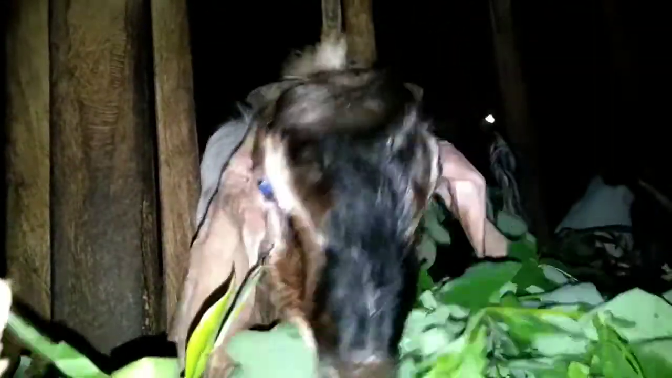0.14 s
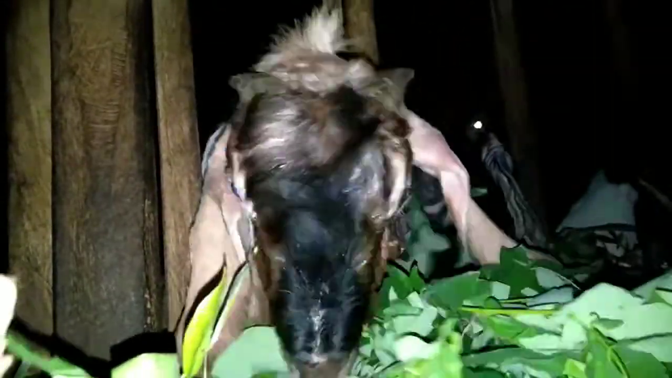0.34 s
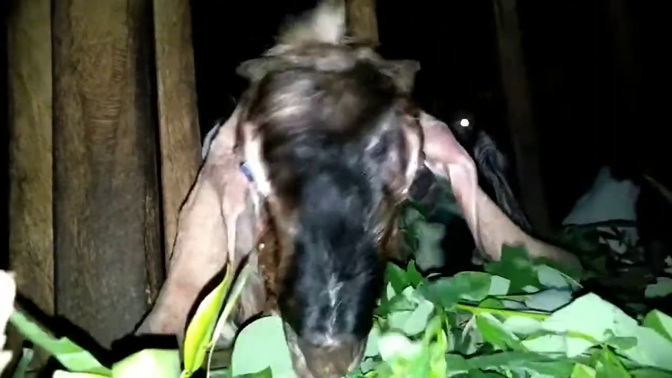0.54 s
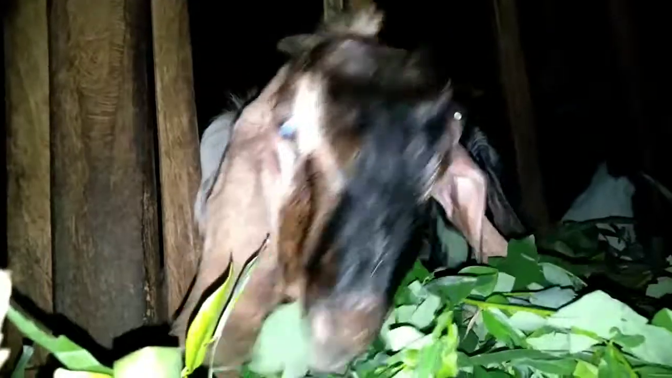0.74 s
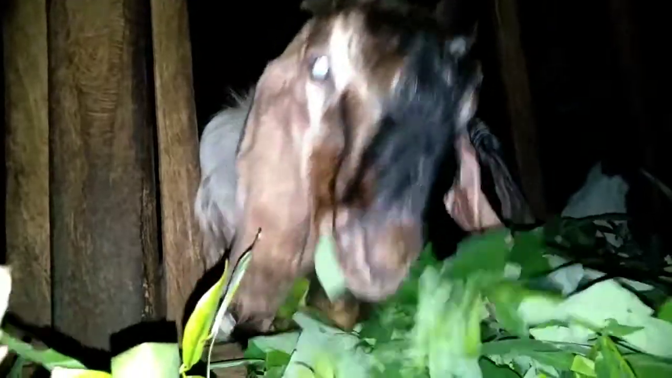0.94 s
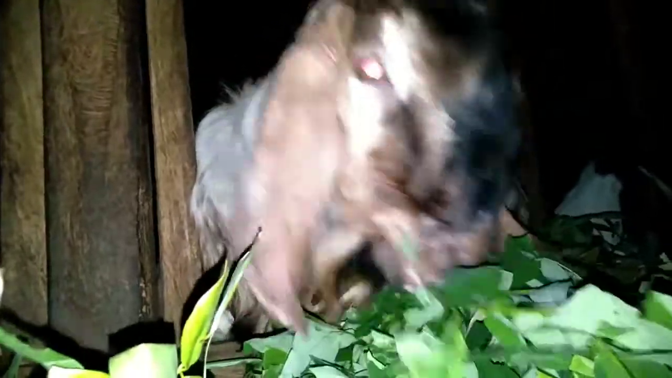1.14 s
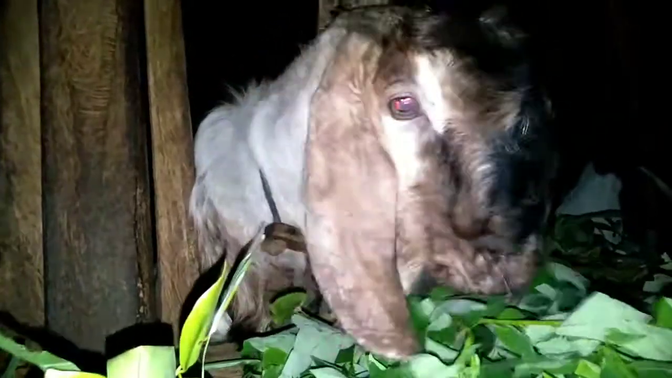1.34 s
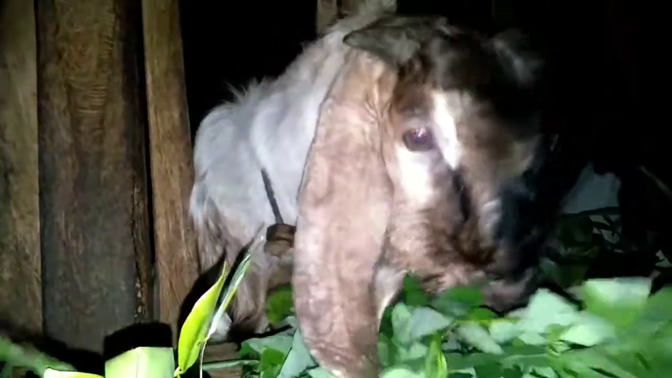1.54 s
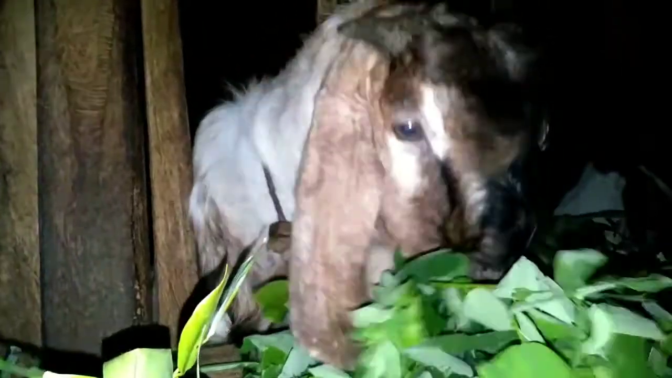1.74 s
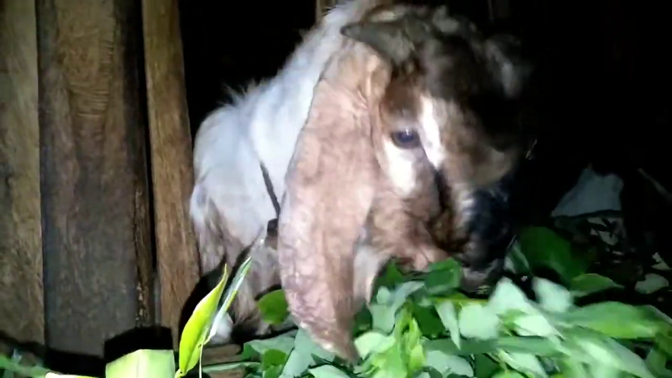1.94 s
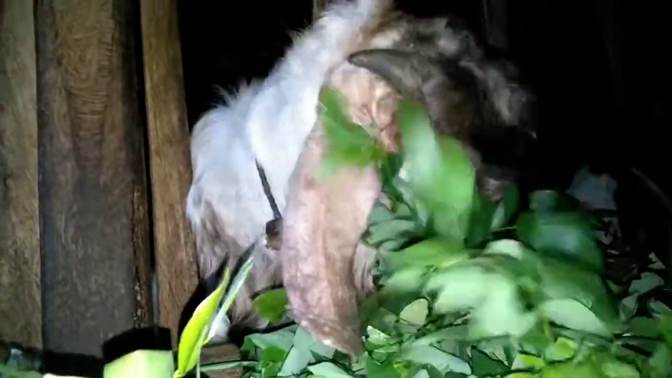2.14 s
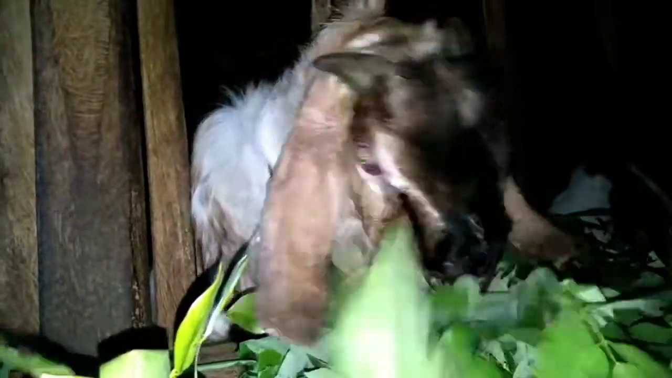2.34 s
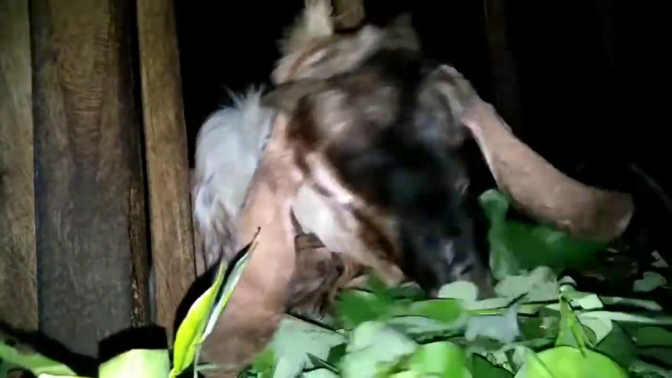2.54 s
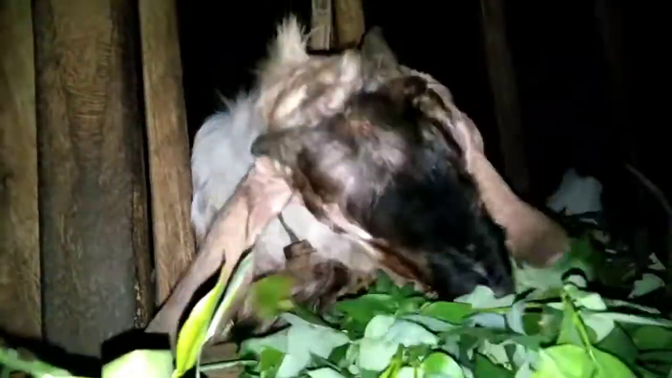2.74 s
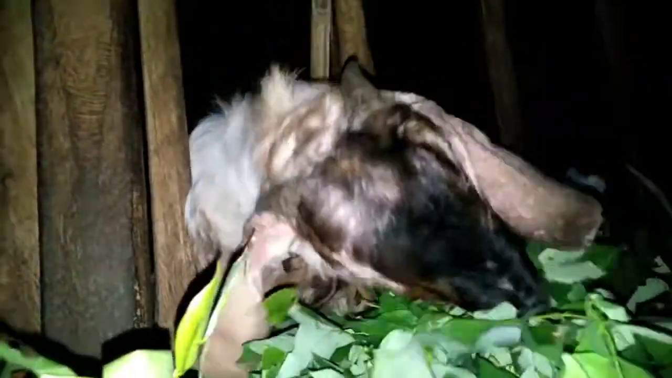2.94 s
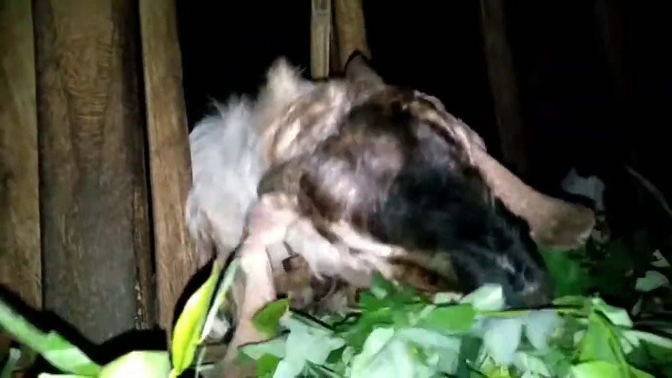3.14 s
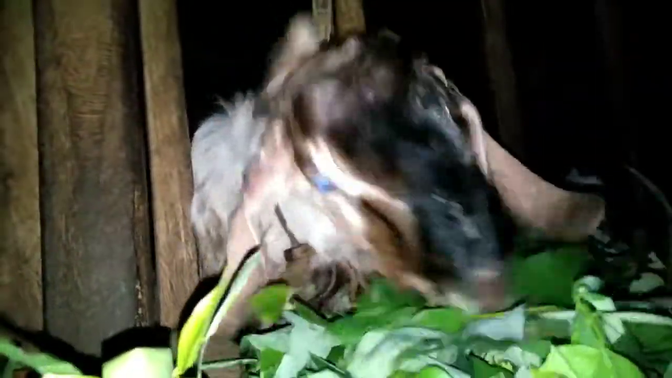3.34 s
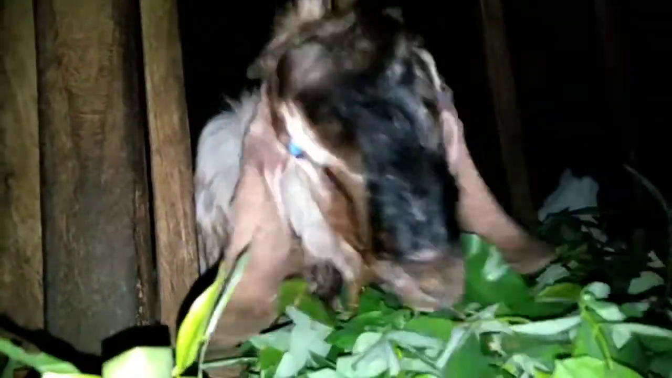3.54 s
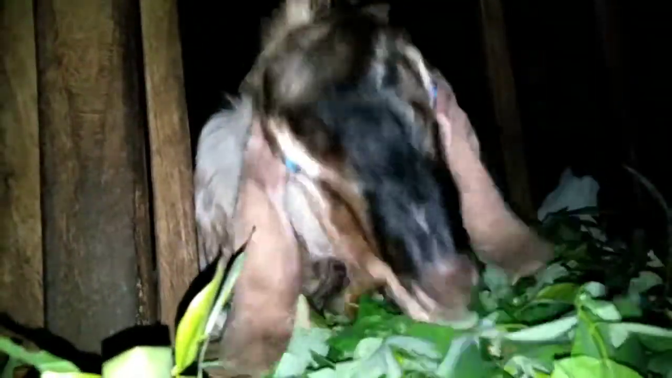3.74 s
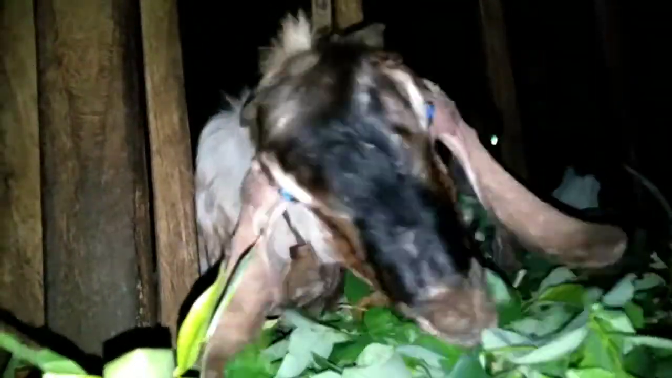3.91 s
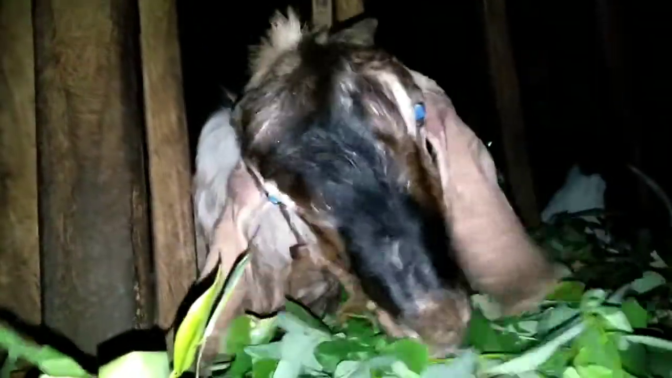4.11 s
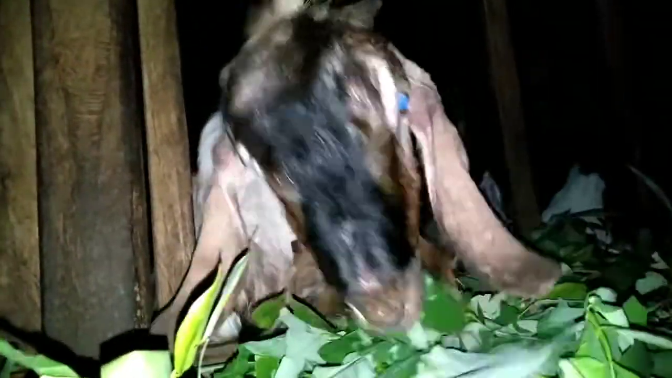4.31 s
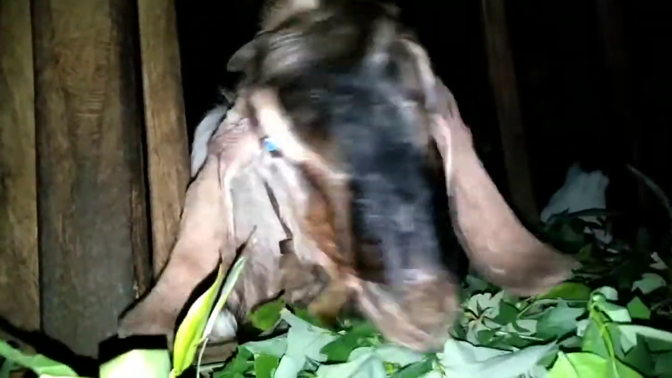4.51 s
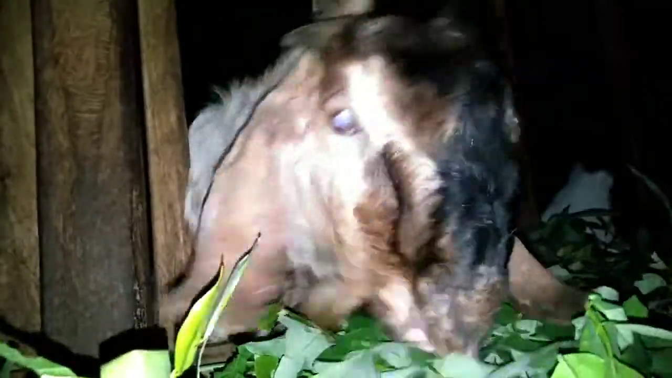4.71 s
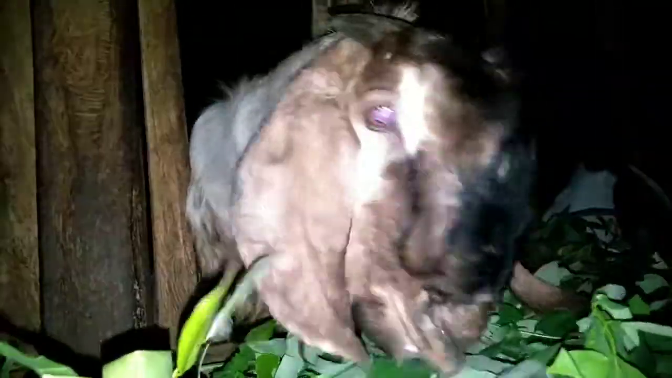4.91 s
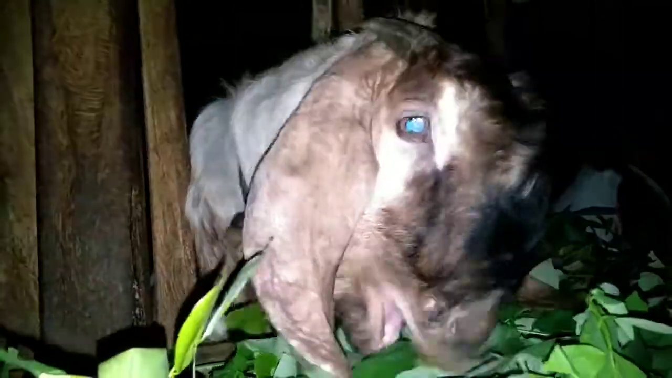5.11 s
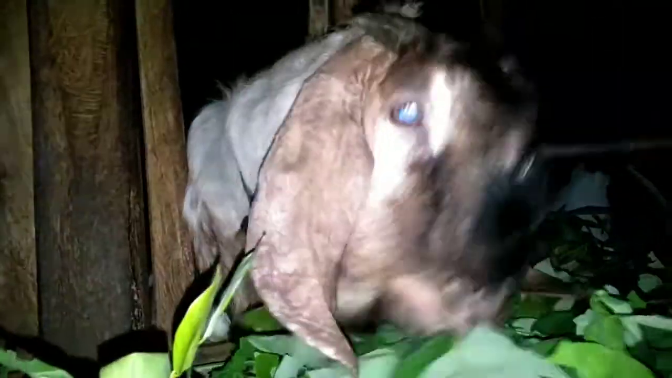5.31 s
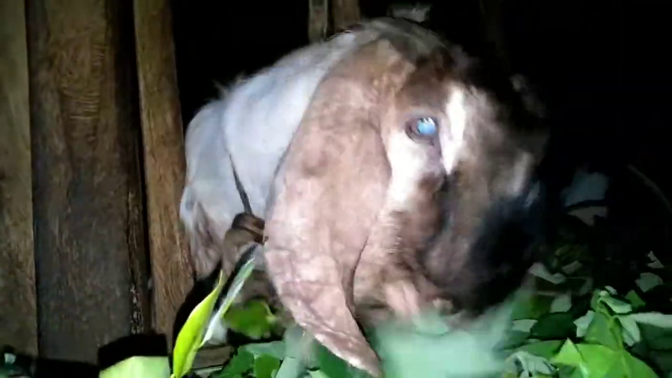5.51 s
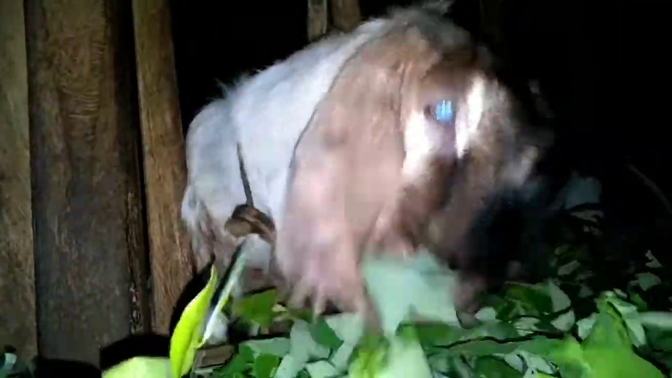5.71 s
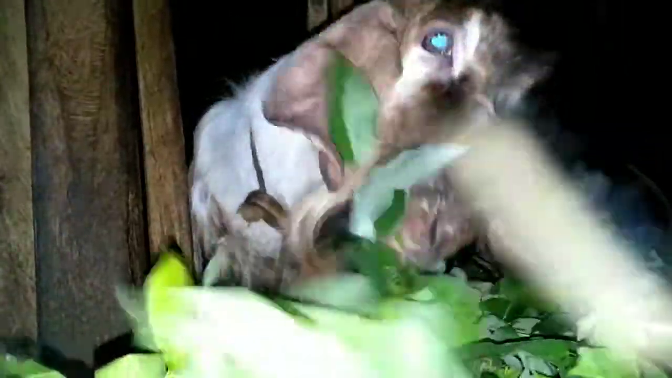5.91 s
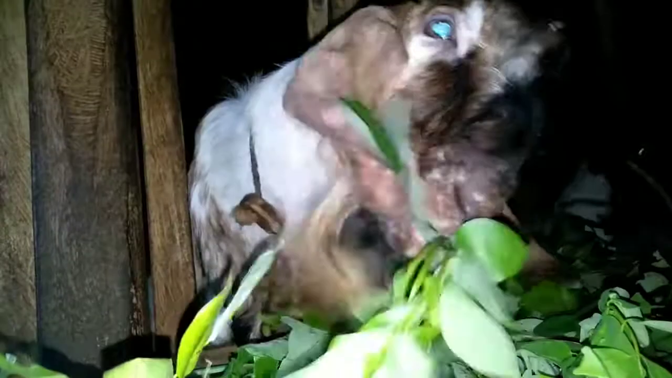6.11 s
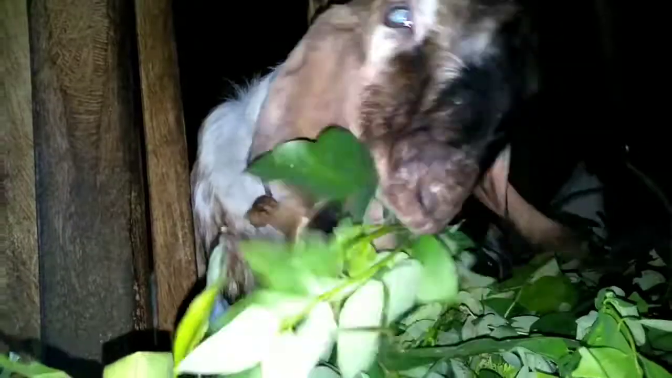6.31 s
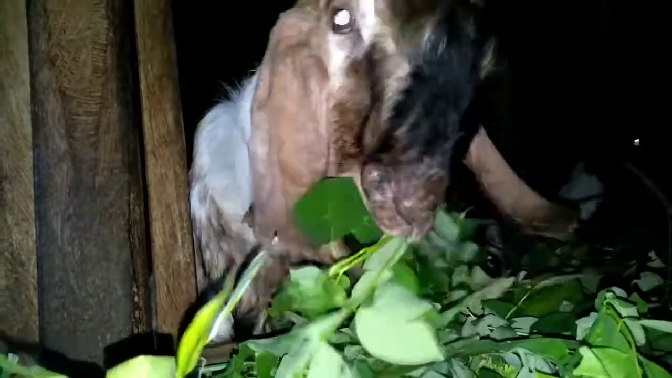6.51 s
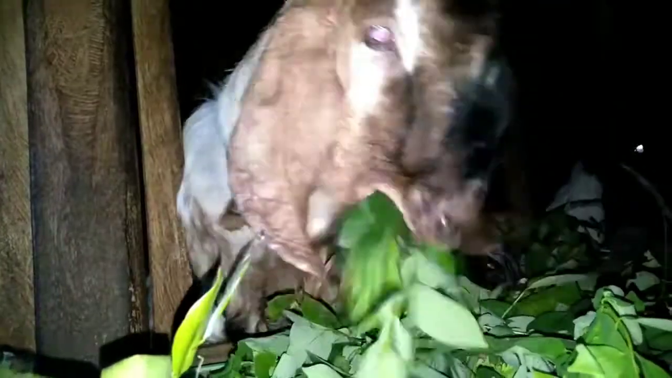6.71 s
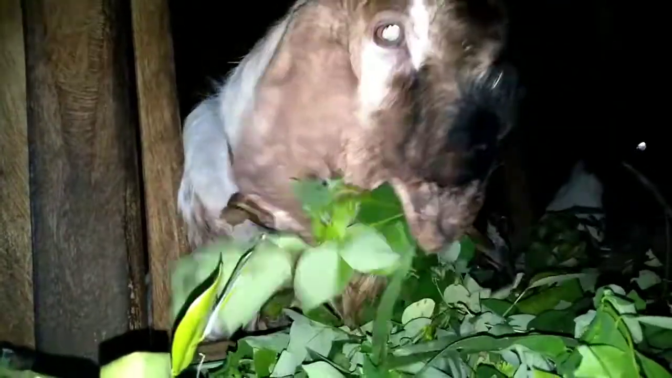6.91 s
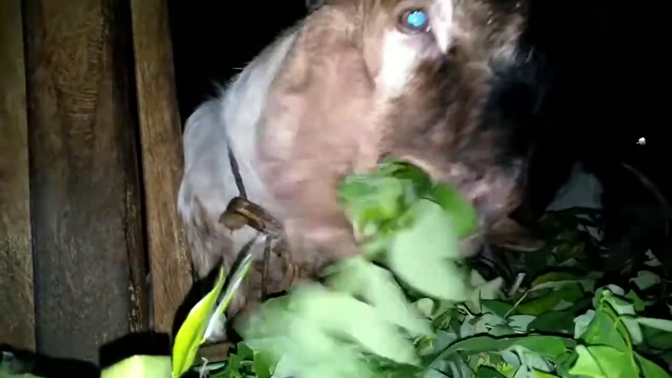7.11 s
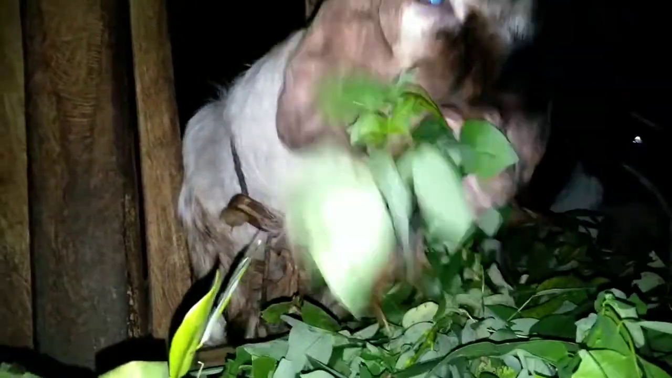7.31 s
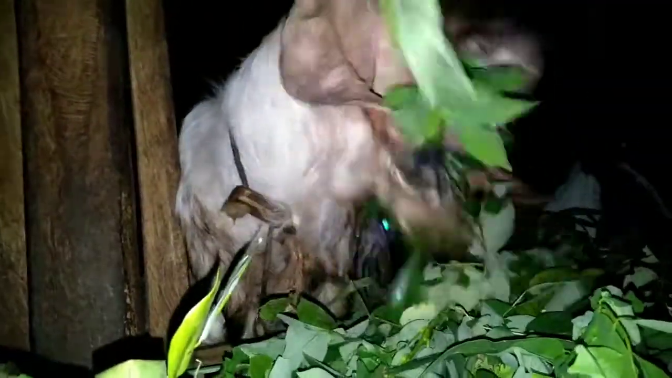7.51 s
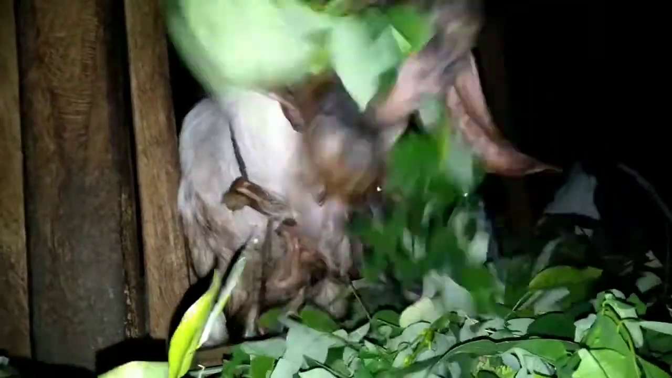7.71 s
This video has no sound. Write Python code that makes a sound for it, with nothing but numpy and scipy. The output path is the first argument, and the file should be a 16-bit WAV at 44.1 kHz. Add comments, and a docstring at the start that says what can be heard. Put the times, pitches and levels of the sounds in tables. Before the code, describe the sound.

Quiet night air and short, dull reflections from boards surround a feeding goat heard up close. Leaves brush and hiss in several swings at first, with stalks snapping. The middle is sparser nibbling, wet tearing and muffled molar crunches. Towards the end the snapping grows denser and sharper, over soft shoves of the heap and a low, unsteady hum sinking in pitch.

```python
"""Leaves rustle, stalks tear and snap and a jaw thuds and munches close by: a goat feeds at night
from a heap of leafy branches in a wooden pen, and a branch is shaken in the first seconds.
Plant sounds are streams of tiny random fractures, filtered and shaped by gesture envelopes; jaw knocks
are short sines and snaps are noise bursts. Near the end a low, wavering hum of sines over rumble
surges in and sinks to a deeper note."""
import sys
import numpy as np
from scipy import signal
from scipy.fft import rfft, irfft, next_fast_len
from scipy.io import wavfile
from scipy.ndimage import uniform_filter1d, map_coordinates

SR = 44100
rng = np.random.default_rng(int(sys.argv[2]) if len(sys.argv) > 2 else 0)


def generate_wav(signal):
    """Clip the signal to [-1, 1] and save it as 16-bit WAV at the path in sys.argv[1]."""
    frames = np.transpose(np.atleast_2d(signal))
    scaled = np.clip(frames, -1, 1) * 32767
    pcm = np.round(scaled).astype(np.int16)
    wavfile.write(sys.argv[1], SR, pcm)


N = 341907
TIME = np.arange(N) / SR

# colour of leaves rubbing: f/Hz, level/dB
LEAF_RUB = [(4400, -15), (5300, 9.5), (6000, 17), (7000, 7), (8000, 5.5), (9000, -60)]
CLUSTER_RATE = 110  # how often the strength of the fractures changes, per s


def undb(db):
    """Decibels to gain."""
    return 10 ** (np.asarray(db) / 20)


def unit(x):
    """Scale to rms 1."""
    return x / np.sqrt(np.mean(x ** 2) + 1e-20)


def curve(rows, column):
    """One column of a table, joined by straight lines in time."""
    rows = np.array(rows)
    return np.interp(TIME, rows[:, 0], rows[:, column])


def colour(x, points):
    """Minimum-phase filter with the given (Hz, dB) outline, falling steeply beyond its ends; rms 1."""
    hz, db = np.transpose(points)
    octave = np.log2(np.maximum(np.fft.rfftfreq(2 * len(x), 1 / SR), 1))
    beyond = np.abs(octave - np.clip(octave, np.log2(hz[0]), np.log2(hz[-1])))
    size = next_fast_len(len(x) + SR // 4, real=True) * 2
    outline = np.interp(octave, np.log2(hz), db) - 30 * np.minimum(beyond, 2)  # 30 dB per octave
    outline = np.interp(np.linspace(0, 1, size // 2 + 1), np.linspace(0, 1, len(outline)), outline)
    # folding the cepstrum onto positive time makes the filter causal
    cepstrum = irfft(np.log(undb(outline)))[:size // 2]
    cepstrum[1:] *= 2
    response = np.exp(rfft(cepstrum, size))
    return unit(irfft(rfft(x, size) * response)[:len(x)])


def band(x, hz, octaves, order=1):
    """Band-pass of a given width around a centre."""
    edges = np.clip([hz * 2 ** (-octaves / 2), hz * 2 ** (octaves / 2)], 10, .48 * SR)
    return signal.sosfilt(signal.butter(order, edges, "band", fs=SR, output="sos"), x)


def fade(t, t60):
    """Exponential decay, 60 dB down after t60."""
    return np.exp(-np.log(1000) * t / max(t60, 1e-3))


def walk(rate):
    """Slow random wander with a spread near 1, with a given number of knots per second."""
    knots = rng.standard_normal(2048)
    return np.interp(TIME * rate, np.arange(len(knots)), knots)


def add(track, s, sound):
    """Mix a sound into the track at a time."""
    start = max(int(s * SR), 0)
    track[start:start + len(sound)] += sound[:max(N - start, 0)]


def stroke(start, hold, attack_s, release_t60, sag_db_per_s=0):
    """Envelope of one effort: a quick rise, a sagging hold and a dying tail."""
    t = np.maximum(TIME - start, 0)
    rise = np.minimum(t / max(attack_s, 1e-3), 1)
    return rise * undb(-sag_db_per_s * t) * fade(np.maximum(t - hold, 0), release_t60)


def swells(rows):
    """Sum of bell-shaped swells from rows of (middle s, length s, dB)."""
    return sum(undb(db) * np.exp(-(2 * (TIME - s) / length) ** 2) for s, length, db in rows)


def crackle(rate, spread_db):
    """A stream of tiny fractures of uneven size and random sign, at a rate per second."""
    breaks = rng.random(N) < rate / SR
    size = undb(spread_db * np.minimum(rng.exponential(size=N), 3.5))
    return breaks * size * np.sign(rng.random(N) - .5)


def pops(count, low_hz, high_hz, ring_s):
    """Tiny cavities of sap and leaf burst, each ringing briefly at its own pitch; rms 1."""
    out, t = np.zeros(N), np.arange(SR // 16) / SR
    for when, pitch, size in rng.random((count, 3)):
        hz = low_hz * (high_hz / low_hz) ** pitch
        ring = np.sin(2 * np.pi * hz * t) * (1 - np.exp(-t / .001)) * fade(t, ring_s)
        add(out, when * N / SR, undb(-16 * size) * ring)
    return unit(out)


def patchy(x, depth_db, width_hz):
    """Random gain over time and frequency: narrow bands swell and vanish, overall level roughly kept."""
    change_rate = 23  # changes per s
    hz, t, z = signal.stft(x, SR, nperseg=512, noverlap=384)
    knots = rng.standard_normal((256, 256))
    # the bands are narrower in the lows
    band_places = np.sqrt(hz * (hz + 2500)) / width_hz
    places = np.meshgrid(band_places, t * change_rate, indexing="ij")
    wander = map_coordinates(knots, places, order=3, mode="wrap")
    gain = undb(depth_db * np.clip(wander, -1, 2.2))
    neighbours = np.sqrt(uniform_filter1d(gain ** 2, size=17, axis=0))
    return signal.istft(z * gain / neighbours, SR, nperseg=512, noverlap=384)[1][:N]


def pen(x):
    """Short, dull scatter from the boards: a decaying burst of band-passed noise as echo."""
    t = np.arange(SR // 2) / SR
    echo = band(rng.standard_normal(len(t)), 720, 6.1) * fade(t, 0.19) * (t > .005)
    return signal.fftconvolve(x, echo / np.sqrt(np.sum(echo ** 2)))[:N]


def boards(x):
    """Close reflections from the boards raise some narrow bands and hollow out others."""
    # peaks and hollows: f/Hz, level/dB
    reflections = [(750, -9), (875, 8), (990, -6), (1125, 7), (1230, -6), (1355, 5), (1850, 3), (2830, 3),
                   (3620, -5), (3920, 6), (4350, -4)]
    for hz, db in reflections:
        x = x + (undb(db) - 1) * signal.lfilter(*signal.iirpeak(hz, 15, fs=SR), x)
    return x


def night():
    """Quiet coloured noise whose level wanders slightly."""
    # colour of the night air: f/Hz, level/dB
    air = [(30, 2), (110, 6), (200, -1), (500, -3), (1000, -17.5), (2200, -16.5), (3200, -8), (4200, -10),
           (5600, -9.5), (8000, -19), (12000, -12), (15500, -22)]
    return colour(rng.standard_normal(N), air) * undb(-72 + .5 * walk(0.89))


def hum():
    """A wavering low tone, its weak octave and a higher drone, over an uneven rumble."""
    # path of the hum, two surges then a deeper note: t/s, f/Hz (before drift), level/dB
    hum_path = [(6.28, 85.4, -87), (6.37, 85.5, -64), (6.5, 86.6, -65.5), (6.53, 78, -53),
                (6.57, 77.9, -57), (6.6, 73, -75), (6.645, 68.4, -46), (6.69, 80.2, -60),
                (6.72, 93.9, -48.5), (6.95, 96.7, -47), (7.1, 96.9, -44.5), (7.19, 94.1, -48),
                (7.25, 67.4, -48.5), (7.31, 61, -49), (7.5, 60.2, -46.5), (7.75, 60.9, -43)]
    # colour of the rumble around the hum: f/Hz, level/dB
    rumble_colour = [(35, -3), (70, 3), (120, 2.5), (150, 2), (200, -6), (300, -11.5), (600, -21.5)]
    drone_hz, drone_db, octave_db, rumble_db = 167.3, -8.5, -10, -6.5
    # drift is a share of the pitch, waver is in dB; the drone has twice as much of both
    phase = 2 * np.pi * np.cumsum(curve(hum_path, 1) * (1 + .035 * walk(30))) / SR
    tone = unit(np.sin(phase) + undb(octave_db) * np.sin(2 * phase)) * undb(1.8 * walk(25))
    drone_phase = 2 * np.pi * np.cumsum(drone_hz * (1 + .07 * walk(30))) / SR
    drone = unit(np.sin(drone_phase) * undb(3.6 * walk(25)))
    rumble = undb(rumble_db) * colour(rng.standard_normal(N), rumble_colour)
    mix = tone + undb(drone_db) * drone + rumble
    return mix * undb(curve(hum_path, 2)) * (TIME > hum_path[0][0])


def thump():
    """One soft, deep bump of a couple of cycles near the end: a sine under a bell-shaped swell."""
    middle_s, length_s, hz, db = 7.067, .022, 88, -33
    return swells([(middle_s, length_s, db)]) * np.sin(2 * np.pi * hz * (TIME - middle_s))


def shoves():
    """The muzzle shoves the heap: it shifts with a soft rumble and a hollow note of its own each time."""
    # shoves: middle t/s, length/s, level/dB, hollow note f/Hz
    pushes = [(0.3, 0.21, -62, 144), (0.7, 0.15, -65, 112), (0.974, 0.11, -55.5, 124),
              (2.03, 0.18, -52, 190), (4.79, 0.13, -60.5, 142), (7.395, 0.48, -54, 250)]
    jolts = crackle(rate=600, spread_db=3)
    rumble = undb(-1) * colour(jolts, [(35, -10.5), (85, 3), (330, -9.5)])
    out = np.zeros(N)
    for s, length, db, hz in pushes:
        hollow = unit(band(jolts, hz, 0.79, order=2))
        out += swells([(s, length, db)]) * (rumble + hollow)
    return out


def shaken_branch():
    """A gentle swing makes a few leaves crackle and ring; a strong one sets a crowd hissing in fine grains."""
    # swings: middle t/s, length/s, level/dB, fine crinkle relative level/dB, leaf rubbing relative level/dB
    swings = [(0.68, 0.32, -64, -25, -5), (0.844, 0.25, -54.5, -6.5, -5), (1.059, 0.16, -46, -13, -2.5),
              (1.178, 0.13, -56.5, -15, -8), (1.302, 0.19, -45, -11, -2), (1.518, 0.13, -48.5, -10, -1.5),
              (1.977, 0.087, -46, -23, -3.5), (2.13, 0.22, -42.5, -14, -3), (2.24, 0.12, -46, -14, -2.5),
              (2.401, 0.16, -44.5, -13, -1.5), (2.534, 0.27, -56, -11, -4.5)]
    # colour of the foliage: f/Hz, level/dB
    foliage = [(240, -9), (450, -18.5), (700, 0), (1200, -2.5), (2000, 3), (2900, 3), (3600, -5),
               (4300, -1.5), (4850, -19.5)]
    # colour of crinkling leaf edges: f/Hz, level/dB
    crinkle_colour = [(6500, -8), (8000, -8.5), (10000, 3.5), (11700, 5.5), (13000, -2.5), (15500, -33.5)]
    # colour of thin leaf tips flicking against each other: f/Hz, level/dB
    tip_colour = [(7500, -16), (8700, 5), (11000, -12), (13500, -2), (15000, -14)]
    crowd_level_db = -52.5  # swing level at which the crowd makes half of the rustle
    crinkle_stretch = 1.17  # crinkle starts sooner and lasts longer than the brushing

    many = crackle(rate=7000, spread_db=2.6) * undb(1.5 * walk(CLUSTER_RATE))
    many = patchy(many, depth_db=4.545, width_hz=220)
    few = crackle(rate=1500, spread_db=2.5) * undb(2.8 * walk(45))
    few = patchy(few, depth_db=12, width_hz=200)

    motion = swells([(s, length, db) for s, length, db, _, _ in swings])
    crinkle = swells([(s, length * crinkle_stretch, db + crinkle_db)
                      for s, length, db, crinkle_db, _ in swings])
    rub = swells([(s, length, db + rub_db) for s, length, db, _, rub_db in swings])

    crowd = motion / (motion + undb(crowd_level_db))
    grains = np.sqrt(crowd) * unit(many) + np.sqrt(1 - crowd) * unit(few)
    tips = undb(-6.5) * colour(crackle(rate=8000, spread_db=2), tip_colour)
    brushing = motion * colour(grains, foliage)
    rubbing = rub * colour(grains, LEAF_RUB)
    return brushing + rubbing + crinkle * (colour(grains, crinkle_colour) + tips)


def plant_fractures(rate):
    """Fractures in clusters, with randomly swelling narrow bands."""
    fractures = patchy(crackle(rate=rate, spread_db=3), depth_db=11.5, width_hz=190)
    return fractures * undb(2.3 * walk(CLUSTER_RATE))


def nibbling():
    """Each tug creaks stalks, tears blades with wet pops and rubs leaves; the heap stirs in between."""
    # tugs: start t/s, hold/s, stalk creak level/dB,
    # blade tearing relative level/dB, leaf rubbing relative level/dB
    tugs = [(0.0, 0.059, -71.5, -1, -1), (0.217, 0.093, -64, 10.5, -4), (0.444, 0.054, -60, -22, -2),
            (0.53, 0.15, -82.5, 9, -9), (0.663, 0.051, -66.5, 15, 4.5), (1.59, 0.036, -53.5, -4, -5.5),
            (1.803, 0.083, -67, -12, -2), (1.876, 0.16, -68.5, 16.5, 0.5), (2.53, 0.073, -56.5, -26, 3),
            (2.632, 0.065, -62, -22, -14), (2.892, 0.015, -62, -16, -8), (3.066, 0.022, -77, -6, 20),
            (3.098, 0.14, -64.5, -1.5, 1), (3.382, 0.14, -56.5, -27.5, -13), (3.479, 0.068, -58, -10.5, -5),
            (3.75, 0.06, -56.5, -12.5, -4), (3.773, 0.13, -58.5, -3, -13), (3.972, 0.33, -62, -10, -9),
            (4.03, 0.13, -62, -3, -7.5), (4.204, 0.054, -57, -3.5, 5.5), (4.444, 0.15, -63, 4.5, 5),
            (4.618, 0.048, -63.5, -4.5, -14), (4.699, 0.11, -53.5, -1.5, -2), (4.853, 0.018, -61, 8.5, 0),
            (5.021, 0.055, -64, -6, 2.5), (5.055, 0.11, -56.5, -2, 4.5), (5.203, 0.06, -59, -5, -5.5),
            (5.312, 0.06, -67, -13, -4), (5.49, 0.11, -57.5, -16, -24), (5.655, 0.063, -66, 2.5, -26),
            (5.826, 0.017, -68, -7, 5.5), (5.901, 0.037, -58, -12.5, -6), (5.982, 0.15, -57.5, -20, -4),
            (6.113, 0.12, -57, -3.5, -2), (6.181, 0.014, -53.5, 3, -2.5), (6.319, 0.0086, -58, 5.5, 1.5),
            (6.381, 0.025, -62.5, 4, 6), (6.44, 0.079, -54, -10, -27), (6.502, 0.042, -52.5, -11.5, -0.5),
            (6.769, 0.1, -52.5, -17, -19), (6.869, 0.01, -58.5, 4.5, -21), (6.937, 0.17, -70.5, -1, -21),
            (7.096, 0.15, -56.5, -21, -14), (7.179, 0.098, -53, 0.5, -4.5),
            (7.321, 0.078, -57.5, 8.5, -7.5), (7.425, 0.081, -57.5, -2.5, -9.5),
            (7.526, 0.015, -44.5, -17, -16), (7.577, 0.035, -53, 5.5, 1), (7.671, 0.096, -68, 9, 3)]
    # colour of creaking stalks: f/Hz, level/dB
    stalk_colour = [(2100, -85.5), (2700, 7), (3150, 15.5), (3800, 6), (4700, -15.5)]
    # colour of tearing blades: f/Hz, level/dB
    tear_colour = [(560, -20), (760, 1.5), (1400, -3), (2000, 10), (2500, -1), (3300, -5.5)]
    # colour of crinkling leaf edges: f/Hz, level/dB
    edge_colour = [(6500, -8), (8000, -8.5), (10000, 3.5), (11700, 5.5), (13000, -2.5), (15500, -33.5)]
    # a tug takes hold quickly and slackens, then the leaves settle; leaves follow the stalk more slowly
    attack_s, leaf_attack_s, sag_db_per_s, release_t60_s = 0.011, 0.015, 24.5, 0.27
    stir_db, wander_db = -79.5, -1.5

    stalk = undb(stir_db + wander_db * walk(9.9))
    tear = undb(stir_db - 3 + wander_db * walk(33))
    rub = undb(stir_db + 3 + wander_db * walk(18))
    for start, hold, db, tear_db, rub_db in tugs:
        pull = undb(db) * stroke(start, hold, attack_s, release_t60_s, sag_db_per_s)
        sway = undb(db + rub_db) * stroke(start, hold, leaf_attack_s, release_t60_s, sag_db_per_s)
        stalk = np.maximum(stalk, pull)
        tear = np.maximum(tear, pull * undb(tear_db))
        rub = np.maximum(rub, sway)
    # leaf edges crinkle in step with the rubbing and with the stalk
    crinkle = np.hypot(rub * undb(-9.5), stalk * undb(-24))

    fibres = plant_fractures(rate=1600)
    blades = plant_fractures(rate=3000)
    edges = plant_fractures(rate=700)
    wet_pops = pops(count=2200, low_hz=611, high_hz=2444, ring_s=0.081)
    dry_ticks = pops(count=500, low_hz=5310, high_hz=7610, ring_s=0.079)
    tearing = undb(-5.5) * colour(blades, tear_colour) + undb(-3.5) * wet_pops
    rubbing = undb(-7.5) * colour(blades, LEAF_RUB) + undb(-5) * dry_ticks
    creaking = stalk * colour(fibres, stalk_colour)
    return creaking + tear * tearing + rub * rubbing + crinkle * colour(edges, edge_colour)


def munching():
    """Leaves crushed between the molars at each stroke, muffled by the cheeks."""
    # strokes of the molars: start t/s, hold/s, level/dB
    chews = [(0.224, 0.083, -52), (0.58, 0.03, -71.5), (0.653, 0.16, -66), (0.929, 0.008, -51.5),
             (1.073, 0.019, -51), (1.272, 0.11, -60.5), (1.587, 0.03, -58.5), (1.944, 0.25, -56.5),
             (2.426, 0.08, -57), (2.747, 0.01, -53.5), (2.959, 0.018, -69), (3.119, 0.011, -56),
             (3.197, 0.01, -47.5), (3.453, 0.11, -59.5), (3.734, 0.12, -68.5), (3.841, 0.022, -44.5),
             (3.953, 0.3, -63), (4.14, 0.16, -61), (4.508, 0.16, -66), (4.699, 0.23, -60.5),
             (5.067, 0.086, -50), (5.216, 0.05, -56), (5.445, 0.13, -57.5), (5.699, 0.08, -67),
             (5.757, 0.085, -59.5), (6.149, 0.086, -60), (6.507, 0.033, -60.5), (6.868, 0.037, -55.5),
             (7.181, 0.09, -48.5), (7.303, 0.14, -50.5), (7.588, 0.06, -46)]
    cheeks = [(100, -23.5), (170, 0.5), (260, 4.0), (430, 7), (600, 4.0), (820, -23.0), (1100, -19.5)]
    grains = patchy(crackle(rate=500, spread_db=2), depth_db=6, width_hz=200)
    pressure = sum(undb(db) * stroke(start, hold, attack_s=0.0076, release_t60=0.24)
                   for start, hold, db in chews)
    return colour(grains, cheeks) * pressure


def bites():
    """The jaw closes through a stalk: a few soft cycles from the mouth cavity and a short crumble."""
    # dull knocks of the jaw: t/s, peak level/dB, f/Hz, ring scale/s (2.5 times the t60 of the knock's fade)
    knocks = [(0.209, -46.5, 497, 0.066), (0.261, -47, 368, 0.05), (0.677, -46, 370, 0.038),
              (0.725, -42, 369, 0.033), (0.911, -49, 550, 0.035), (0.932, -33, 424, 0.016),
              (0.982, -45.5, 287, 0.017), (1.061, -39, 268, 0.02), (1.296, -37.5, 556, 0.038),
              (1.601, -40, 530, 0.0098), (1.615, -44.5, 347, 0.061), (1.793, -52.5, 242, 0.039),
              (1.884, -47, 620, 0.037), (2.763, -41.5, 527, 0.031), (3.004, -52.5, 1000, 0.038),
              (3.1314, -26.5, 530, 0.014), (3.208, -42, 434, 0.011), (3.2336, -31.5, 470, 0.0093),
              (3.8405, -34, 665, 0.0095), (3.88, -47, 437, 0.047), (4.162, -43.5, 453, 0.017),
              (4.185, -41, 495, 0.025), (4.202, -47, 500, 0.011), (4.215, -36, 445, 0.032),
              (4.554, -40.5, 470, 0.023), (4.572, -38, 430, 0.022), (4.63, -43, 280, 0.025),
              (4.81, -39.5, 500, 0.031), (4.825, -41.5, 225, 0.015), (5.073, -37.5, 330, 0.019),
              (5.132, -40, 510, 0.021), (5.482, -33.5, 463, 0.022), (5.786, -43, 522, 0.037),
              (5.816, -34.5, 452, 0.031), (6.19, -41.5, 535, 0.027), (6.376, -51.5, 251, 0.05),
              (6.911, -30.5, 230, 0.012), (7.225, -36, 483, 0.025), (7.615, -34, 787, 0.019)]
    out, t = np.zeros(N), np.arange(SR // 8) / SR
    for s, db, hz, ring_s in knocks:
        knock = np.sin(2 * np.pi * hz * t) * t ** 2 * fade(t, 0.4 * ring_s)
        crumble = band(rng.standard_normal(len(t)) * t * fade(t, 0.026), 0.72 * hz, 1.35, order=2)
        sound = knock / np.abs(knock).max() + undb(-22.5) * crumble / np.abs(crumble).max()
        add(out, s, undb(db) * sound / np.abs(sound).max())
    return out


def snaps():
    """Fibres give way in a quick run that rings the stalk and takes a crisp edge from the leaf."""
    # stalks and leaf ribs breaking: t/s, peak level/dB, f/Hz, crisp treble relative level/dB,
    # ring t60/s, width/octaves
    breaks = [(0.2392, -35.5, 1860, -43, 0.027, 0.57), (0.262, -48.5, 6030, -5, 0.046, 0.13),
              (0.458, -58, 2820, -5, 0.065, 0.57), (0.494, -49, 2400, -26, 0.077, 0.063),
              (0.637, -48.5, 2290, -15, 0.028, 0.91), (0.783, -37.5, 3690, 6, 0.027, 0.25),
              (0.933, -44, 690, -30, 0.032, 1.3), (1.045, -30, 5680, -18, 0.046, 0.41),
              (1.307, -24, 6060, -14, 0.016, 0.41), (1.61, -39.5, 2600, -29, 0.042, 0.35),
              (1.716, -50, 2250, -6, 0.055, 1.2), (1.7652, -51.5, 6880, -4, 0.043, 0.3),
              (2.393, -34, 4900, -12, 0.0081, 0.52), (2.684, -48, 3100, -14, 0.044, 0.45),
              (2.903, -54, 6000, -15, 0.054, 0.15), (2.983, -52.5, 2180, -22, 0.031, 0.38),
              (3.133, -35.5, 1250, -20, 0.018, 1.4), (3.163, -45, 3700, -17, 0.02, 0.19),
              (3.21, -45.5, 3750, -5, 0.045, 0.3), (3.233, -41.5, 3820, -1.5, 0.021, 0.42),
              (3.353, -46.5, 3230, -35, 0.061, 0.2), (3.4772, -38.5, 6180, -17, 0.013, 0.11),
              (3.537, -44.5, 3020, 19, .025, 0.31), (3.767, -43, 3450, -28, 0.089, 0.2),
              (4.067, -47.5, 930, -35, 0.23, 0.54), (4.218, -39.5, 4900, -5, 0.15, 0.79),
              (4.2912, -41, 2820, 20, 0.03, .4), (4.4097, -41, 3400, 6.5, 0.12, 0.63),
              (4.498, -47.5, 1450, -17, .05, 0.3), (4.554, -43, 3200, -26, 0.026, 0.31),
              (4.572, -38, 3450, -17, 0.026, 0.19), (4.678, -41, 2870, -38, 0.077, 0.28),
              (4.705, -43.5, 1330, -24, 0.073, 1.2), (4.827, -46, 1620, -11, .025, 2),
              (4.857, -47, 860, -12, 0.024, 0.69), (5.075, -42.5, 1500, -17, 0.027, 1.1),
              (5.093, -41, 2050, -17, 0.08, 0.89), (5.156, -46, 2480, -8, 0.036, 0.74),
              (5.248, -44.5, 3150, -22, 0.048, 0.28), (5.295, -50, 3800, -7, 0.056, 0.13),
              (5.435, -50, 3370, -1.5, 0.11, 0.14), (5.498, -43, 1900, -41, 0.19, 0.56),
              (5.824, -49.5, 2780, -4, 0.15, 0.24), (5.886, -46.5, 1800, -24, 0.066, 0.26),
              (6.0083, -37, 3160, -6.5, 0.075, 0.46), (6.047, -39, 3200, -9, 0.027, 0.43),
              (6.128, -38.5, 3230, 0.5, 0.065, 0.45), (6.1617, -40, 2990, 14, 0.011, 0.36),
              (6.1867, -43, 3420, 1, 0.17, 0.27), (6.2194, -45, 3220, 14, 0.017, .3),
              (6.23, -45, 3200, 16, 0.014, .3), (6.26, -49, 3200, 12, .01, .3),
              (6.281, -46.5, 3100, -11, 0.065, 0.31), (6.33, -37.5, 2500, -17, 0.022, 0.38),
              (6.365, -42.5, 5950, -14, 0.04, 0.23), (6.408, -49, 2500, -17, 0.15, 0.26),
              (6.5143, -37, 3600, -2, 0.033, 0.15), (6.5307, -42.5, 3550, 4, 0.13, 0.21),
              (6.7909, -44, 3550, -13, 0.037, 0.17), (6.892, -33.5, 3370, -10.5, 0.018, 0.2),
              (7.2002, -31, 2850, -6.5, 0.015, 0.85), (7.225, -27.5, 3100, -11, 0.0054, 0.48),
              (7.2618, -35, 2680, -21, 0.04, 0.59), (7.307, -37.5, 2000, -33, 0.019, 0.5),
              (7.3403, -25, 1510, -40, 0.0061, 1.55), (7.3699, -32, 1730, -40, 0.023, 0.67),
              (7.376, -39, 1500, -39, 0.037, 1.5), (7.587, -32.5, 3300, -9, 0.0058, 0.19),
              (7.6081, -27, 2800, -45, 0.016, 0.27), (7.6097, -24.5, 1560, -46, 0.053, 0.61)]
    out, t = np.zeros(N), np.arange(SR // 8) / SR
    for s, db, hz, crisp_db, ring_s, octaves in breaks:
        uneven = undb(2 * rng.standard_normal(len(t)))
        fibres = rng.standard_normal(len(t)) * uneven * (1 - np.exp(-t / 0.0003))
        stalk = unit(band(fibres * fade(t, ring_s), hz, octaves, order=2))
        crisp = fibres * (1 - np.exp(-t / 0.00033)) * fade(t, 1.2 * ring_s)
        edge = unit(band(crisp, 10040, 0.49, order=3))
        sound = stalk + undb(crisp_db) * edge
        add(out, s, undb(db) * sound / np.abs(sound).max())
    return out


def scene():
    """All sits in the middle, but treble scatter of feeding, shaken branch, shoves and thump spreads a little."""
    hits = bites() + patchy(snaps(), depth_db=4.545, width_hz=320)
    feeding = boards(hits + undb(-10.5) * pen(hits) + nibbling() + munching())
    goat = feeding + shaken_branch() + shoves() + thump()
    side = undb(-11) * band(pen(goat), 12000, .7, order=3)
    return goat + hum() + night() + np.array([side, -side])


def record(dry):
    """A steep low-pass cuts the very top, above 15.7 kHz."""
    return signal.sosfilt(signal.ellip(8, .2, 70, 15700, fs=SR, output="sos"), dry)


dry = scene()
out = record(dry)
generate_wav(out)
```